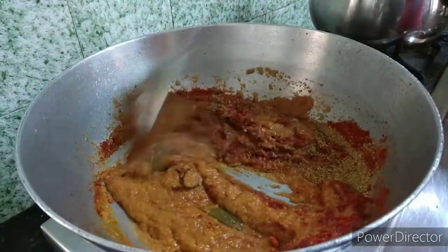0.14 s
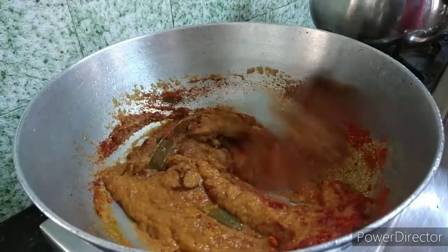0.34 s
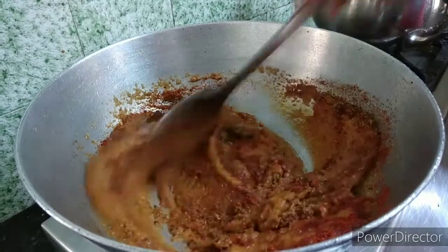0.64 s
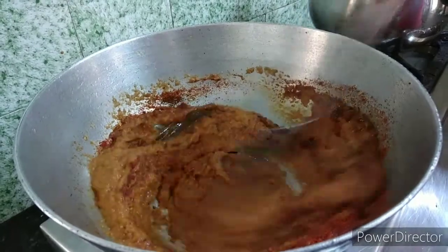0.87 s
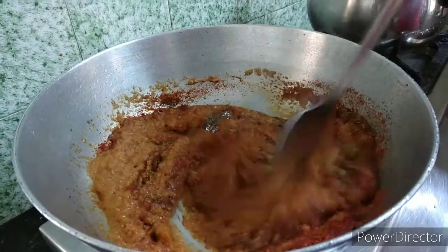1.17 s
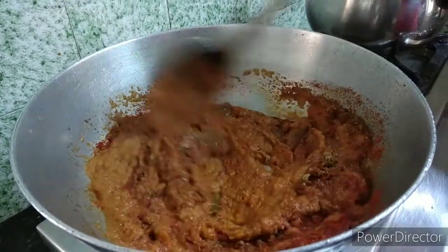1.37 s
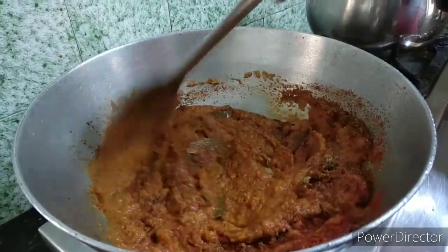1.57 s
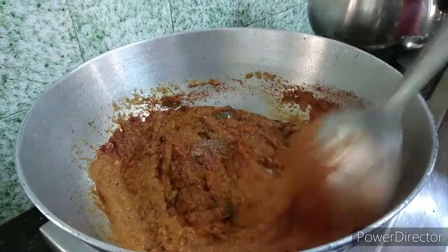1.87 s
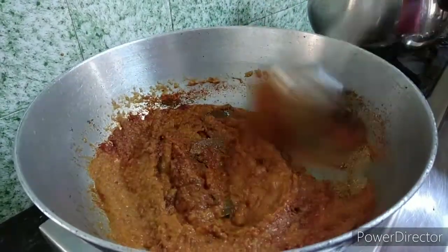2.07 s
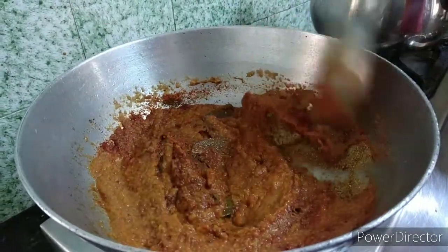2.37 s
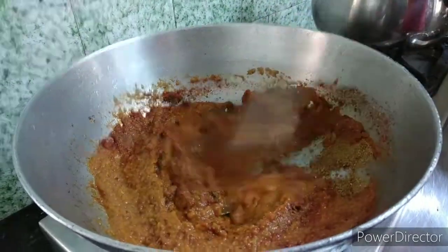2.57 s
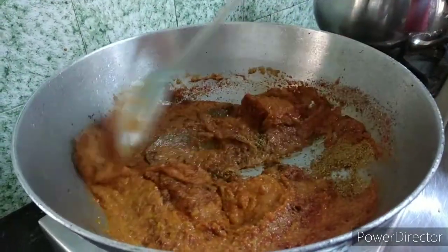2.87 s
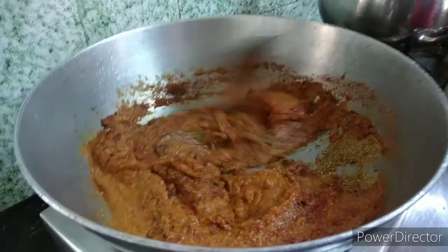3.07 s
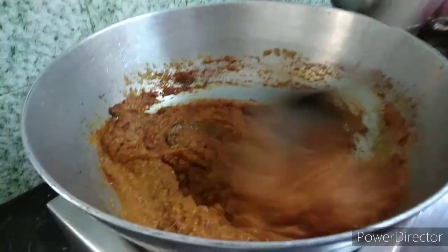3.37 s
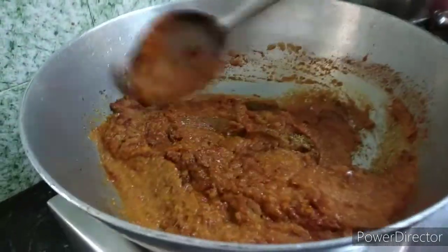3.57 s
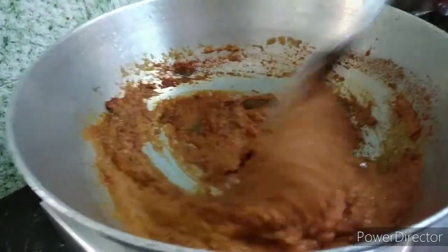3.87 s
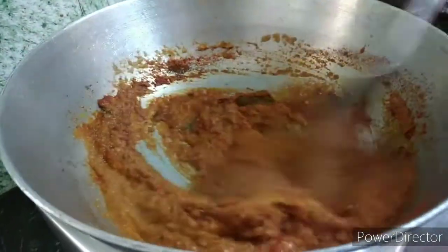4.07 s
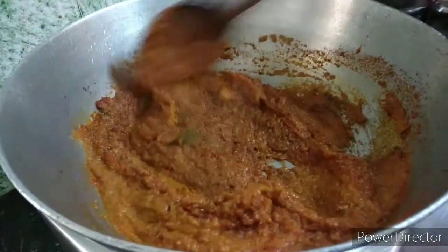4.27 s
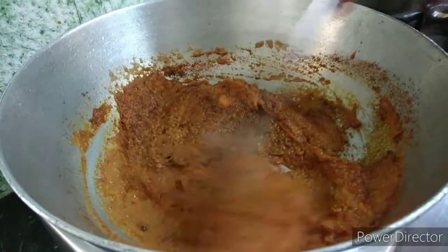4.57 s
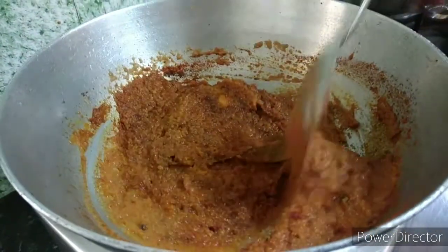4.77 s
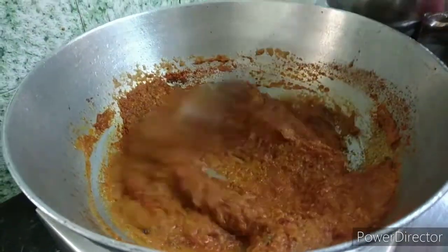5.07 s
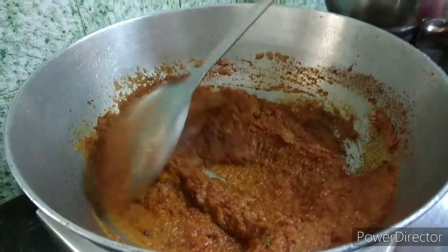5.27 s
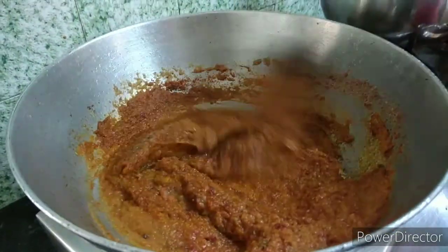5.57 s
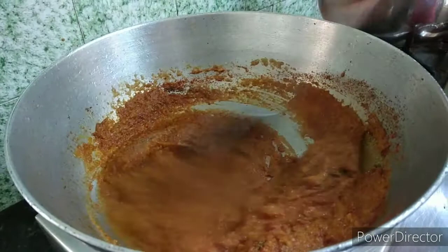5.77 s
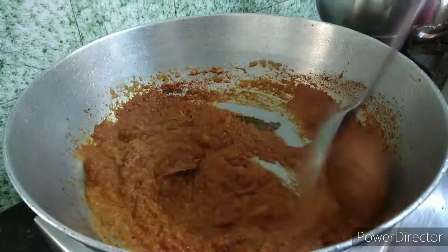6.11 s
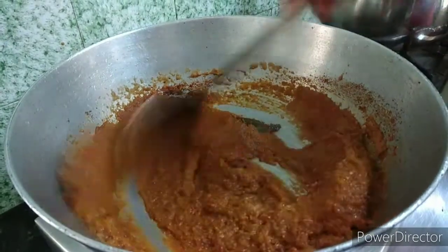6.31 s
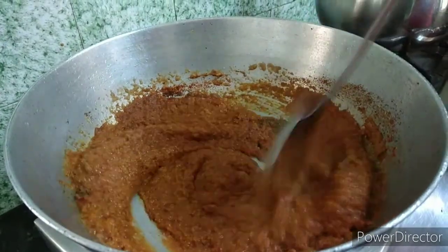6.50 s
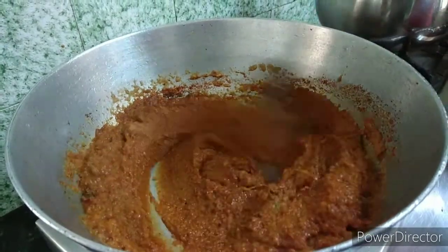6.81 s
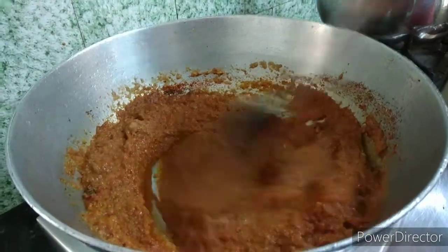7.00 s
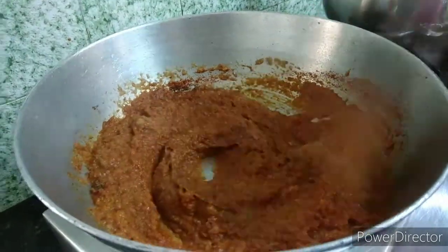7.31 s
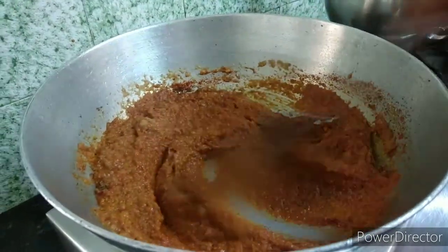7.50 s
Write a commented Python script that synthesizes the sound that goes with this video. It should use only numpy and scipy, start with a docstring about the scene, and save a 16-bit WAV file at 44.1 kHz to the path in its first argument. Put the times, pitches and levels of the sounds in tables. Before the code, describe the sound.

A metal spoon scrapes and knocks in a wide metal pan of thick gravy, uneven quick strokes, faint sizzle, close up in a small kitchen.

```python
"""A spoon scrapes and knocks in a wide metal pan of thick gravy, close to a phone with two microphones.
The spoon's edge slips in dense tiny jerks, and each knock is a sharp blow with a short noisy rattle of rebounds;
both excite banks of damped metal modes. Filtered noise makes the rumbling stand, faint sizzle, spits and hiss.
The bare rim rings on as pairs of beating sines and the lifted spoon as plain ones; decaying noise is the room."""
import sys
import numpy as np
from scipy import signal
from scipy.fft import rfft, irfft
from scipy.io import wavfile
from scipy.ndimage import uniform_filter1d, map_coordinates

SR = 44100
rng = np.random.default_rng(int(sys.argv[2]) if len(sys.argv) > 2 else 0)


def master(y):
    """Save y as 16-bit WAV."""
    cut = np.clip(np.atleast_2d(y).T, -1, 1)
    pcm = np.round(cut * 32767)  # scale
    wavfile.write(sys.argv[1], SR, pcm.astype(np.int16))


N = 337365

# Where the spoon touches decides which modes speak loudest. Each row: time in seconds, favoured pitch of the
# bowl, wall and edge in Hz before wandering, wall share in dB, left minus right in dB.
CONTACT = [(0.1, 910, 2280, 9050, 2, -1.5), (0.21, 712, 2040, 9200, -2, -0.5),
           (0.42, 896, 2600, 9100, -1, -0.5), (0.56, 750, 2940, 8900, 0, 0), (0.62, 793, 2970, 7550, 7, -1),
           (0.665, 800, 2600, 8200, 6.5, 0.5), (0.71, 872, 2640, 8700, -1, 0.5),
           (1.0, 750, 2860, 9500, 3.5, -1), (1.45, 415, 2900, 8850, 0.5, 0),
           (1.62, 740, 1530, 9600, 5, 1.5), (1.7, 756, 1920, 7900, -2, -2.5),
           (1.9, 700, 1950, 7940, -5.5, -1.5), (2.34, 556, 1970, 8570, -5, -4),
           (2.46, 680, 1900, 8500, 7.5, 0.5), (2.83, 630, 2230, 9000, 1, 0.5),
           (3.0, 742, 2280, 9450, -1, -1), (3.56, 585, 2600, 8960, -0.5, 0), (3.93, 850, 2190, 9500, -3, 2),
           (4.27, 477, 2560, 9100, 1.5, 0.5), (4.41, 1090, 2450, 8850, -0.5, -1.5),
           (4.56, 780, 2270, 9000, 1, 1), (4.84, 825, 2160, 9000, 4.5, 1), (5.2, 445, 1900, 9050, 3, -0.5),
           (5.6, 858, 2780, 9000, 0, -0.5), (5.88, 690, 2900, 8950, 0, 0), (5.93, 684, 2850, 9550, 8, -3.5),
           (5.97, 696, 2540, 9500, 5.5, -1), (6.02, 898, 2140, 9500, -0.5, -0.5),
           (6.16, 894, 2420, 9500, 2.5, -1), (6.54, 757, 2930, 9100, -0.5, -1),
           (6.9, 694, 2640, 9000, 1.5, 0), (7.26, 1035, 2150, 7340, 2, -0.5),
           (7.35, 714, 2430, 8000, 1.5, -1), (7.45, 650, 2570, 8600, 2.5, 2.5)]


def undb(db):
    """Decibels to gain."""
    return 10 ** (np.asarray(db) / 20)


def unit(x):
    """Scale to rms 1."""
    return x / np.sqrt(np.mean(x ** 2))


def curve(rows):
    """Columns of a time table, one value a sample."""
    s, *columns = np.transpose(rows)
    t = np.arange(N) / SR
    return np.array([np.interp(t, s, column) for column in columns])


def along(table, hz):
    """Read a (Hz, value) table on a log frequency axis."""
    f, value = np.transpose(table)
    return np.interp(np.log(hz), np.log(f), value)


def band(x, lo_hz, hi_hz):
    """Band-pass."""
    return signal.sosfilt(signal.butter(2, [lo_hz, hi_hz], "band", fs=SR, output="sos"), x)


def rings(hz, db, t60, seconds, sign=1):
    """Response to one tap: a sum of sines, each losing 60 dB in its t60 seconds."""
    t = np.arange(int(seconds * SR)) / SR
    hz, gain, t60 = (np.asarray(v)[:, None] for v in (hz, sign * undb(db), t60))
    decay = np.exp(-np.log(1000) * t / t60)
    return np.sum(gain * np.sin(2 * np.pi * hz * t) * decay, axis=0)


def through(x, response):
    """Convolve and keep the length."""
    return signal.oaconvolve(x, response)[:N]


def walk(rate):
    """Random levels held 1 / rate seconds and smoothed twice; spread near 1."""
    k = int(SR / rate)
    steps = np.repeat(rng.standard_normal(N // k + 1), k)
    return 1.555 * uniform_filter1d(uniform_filter1d(steps, k), k)[:N]


def hump(start_s, rise_s, hold_s, fall_db_per_s):
    """Gain that rises, holds and then fades."""
    t = np.arange(N) / SR - start_s
    fade = undb(-fall_db_per_s * np.maximum(t - rise_s - hold_s, 0))
    return np.clip(t / rise_s, 0, 1) * fade


def even(response, power, width_hz):
    """Bring the broad colour of a response to the given power per Hz, causally; the fine modes stay."""
    n = 2 * (len(power) - 1)
    k = int(width_hz * n / SR)

    def smooth(v):
        return uniform_filter1d(uniform_filter1d(v / v.sum(), k), k) + 1e-7

    spectrum = rfft(response, n)
    log_gain = np.log(smooth(power) / smooth(np.abs(spectrum) ** 2)) / 2
    # folding the cepstrum onto its first half makes the correction minimum phase
    cepstrum = irfft(log_gain, n)
    cepstrum[1:n // 2] *= 2
    cepstrum[n // 2 + 1:] = 0
    return irfft(spectrum * np.exp(rfft(cepstrum)), n)[:len(response)]


def slips(per_s, spread_db, patchy_db):
    """Stick-slip jerks: random impulses of either sign and uneven size, coming in patches."""
    when, size, sign = rng.random((3, N))
    uneven_db = -spread_db * np.log(np.maximum(size, .01))
    patches_db = patchy_db * (walk(45) + 0.59 * walk(220))
    return unit((when < per_s / SR) * np.sign(sign - .5) * undb(uneven_db + patches_db))


def touches():
    """Force of the sliding and knocking spoon on the bowl, wall and edge modes (part, ear, sample)."""
    # Spoon pressure, one list a stroke. Each row: time in seconds, level in dB, brightness in dB.
    strokes = [
        [(0.0, -33.5, -17), (0.06, -40, 2.5), (0.078, -38.5, 3.5), (0.18, -39, -0.5), (0.215, -27, 0),
         (0.264, -31.5, 2), (0.398, -33.5, -4), (0.434, -36, 7.5), (0.585, -32, -3), (0.615, -24, 3.5),
         (0.672, -30.5, 5), (0.725, -21, -8), (0.74, -47, -11)],
        [(0.782, -40.5, -3), (0.872, -31, 5.5), (0.93, -40.5, -3)],
        [(0.966, -30.5, 4), (1.005, -30.5, 3), (1.05, -35, 7), (1.122, -34.5, -7.5), (1.168, -42.5, 11)],
        [(1.44, -38.5, -11), (1.456, -39, -3), (1.51, -50.5, 7)],
        [(1.62, -23, 1), (1.652, -27.5, -8), (1.686, -33, 5), (1.702, -24.5, 2), (1.75, -20, -2),
         (1.795, -25, 2.5), (1.842, -37, 3), (1.88, -32, 7), (1.92, -60, -8)],
        [(2.336, -50.5, -18), (2.376, -49, -19), (2.382, -39.5, -21), (2.436, -34, -20.5), (2.48, -36.5, -5.5)],
        [(2.8, -32, -9), (2.85, -37, -5), (2.934, -39, 2)],
        [(2.955, -26, -1), (3.01, -28.5, 0.5), (3.06, -32, 2), (3.13, -45, 3.5), (3.185, -42.5, 1),
         (3.206, -33.5, -2.5)],
        [(3.56, -33, -1), (3.59, -33, 0), (3.642, -36.5, 6)],
        [(3.935, -20.5, 12.5), (3.98, -29, -8)],
        [(4.28, -44.5, 7), (4.352, -38, 6.5), (4.448, -25, -1), (4.558, -26.5, -10.5), (4.574, -45, -5),
         (4.648, -39.5, -29)],
        [(4.845, -26, -7), (4.88, -43, -4)],
        [(5.21, -50, -25), (5.252, -42.5, -6), (5.304, -29.5, 2.5), (5.376, -25.5, -11), (5.398, -29, 2.5),
         (5.43, -57, -30)],
        [(5.48, -39, 4.5), (5.54, -37.5, -3), (5.556, -34, -5.5), (5.728, -44, 4.5), (5.734, -39, 7),
         (5.842, -39.5, -0.5)],
        [(5.886, -24, -5.5), (5.95, -27, 3), (6.016, -27.5, -9), (6.09, -31, -3)],
        [(6.126, -28, 5), (6.136, -22.5, -3), (6.16, -23.5, 1.5), (6.2, -36, -5)],
        [(6.418, -47, -7), (6.439, -47, -9), (6.446, -29.5, -9), (6.502, -36, -7)],
        [(6.552, -30, 5.5), (6.682, -29, -2.5), (6.738, -44, 5), (6.768, -32.5, 4), (6.84, -37, -6.5),
         (6.88, -38, 1), (6.95, -35.5, 5)],
        [(7.265, -27, 12), (7.286, -35, 14), (7.336, -24.5, -4), (7.38, -22.5, -6), (7.424, -26.5, -1),
         (7.442, -36, 3)],
    ]
    # Each row: start in seconds, force on the edge in dB, bowl share in dB, wall share in dB, rebounds in dB.
    knocks = [(0.0796, -5, 2, -2.5, -31.5), (0.186, -12.5, 6, -3, -33), (0.728, -7.5, 8.5, -4, -35),
              (0.9654, -4.5, -0.5, 1, -31), (1.1591, -1, -20, -15, -32), (1.4383, 2, -6.5, -6, -55),
              (1.6115, 9, 3, -2, -36), (1.7332, -4, -15, -10, -31), (1.7536, 0.5, 5, -6, -35.5),
              (1.9267, -13.5, 11.5, 5, -35.5), (2.3785, -33.5, 14, -3, -31), (2.4035, -27, 17.5, -7, -30.5),
              (2.7962, 1, -1, -6.5, -31.5), (3.002, -9, 11, -4, -33), (3.137, -6.5, 2, -9, -39.5),
              (3.5552, 2.5, -5.5, -13, -31), (3.9294, 15.5, -4, 3.5, -39), (4.2728, -3.5, 0, -5, -31),
              (4.8391, 8, 4, 6.5, -37), (4.8523, 1.5, 1, -12.5, -33), (5.2062, -17.5, 19.5, 10, -34.5),
              (5.3922, -6.5, -3, -6, -30.5), (5.4816, -12.5, 6.5, 3.5, -32), (5.5495, -8.5, 2, -10, -29.5),
              (5.7320, -3.5, -7, -7, -36), (5.886, -2.5, 6, 4.5, -37.5), (5.9529, 9, -16, -5, -47),
              (5.9943, -0.5, 3, 1, -44), (6.4408, -14.5, 4.5, 0.5, -31), (6.55, -4, -2.5, -1, -30.5),
              (6.7651, -13.5, -5, 3, -29), (6.9083, -5.5, -7, -5, -30), (7.2591, 16.5, -15.5, -0.5, -34.5)]
    land_s, lift_s, lift_db, lift_brighter_db = 0.0062, 0.074, -39, 4.5  # fast landing, fade as the spoon lifts
    wall_db, wall_per_bright = -4, 0.78  # the wall follows the brightness less than the edge does

    force, t = np.zeros((3, N)), np.arange(N) / SR
    jerks = slips(1600, spread_db=3.5, patchy_db=3.0)
    wall_share_db, pan_db = curve(CONTACT)[3:]
    for stroke in strokes:
        start_s = stroke[0][0]
        end_s, end_db, end_bright_db = stroke[-1]
        lift = (end_s + lift_s, end_db + lift_db, end_bright_db + lift_brighter_db)
        bowl_db, bright_db = curve([*stroke, lift])
        stroke_wall_db = bowl_db + wall_share_db + wall_db + wall_per_bright * bright_db
        on = np.clip((t - start_s) / land_s, 0, 1) * (t <= end_s + lift_s)
        force += on * jerks * undb([bowl_db, stroke_wall_db, bowl_db + bright_db])

    # a knock is one sharp blow and a short rattle of rebounds
    after = np.arange(int(.03 * SR)) / SR
    chance = rng.standard_normal((len(knocks), len(after)))
    for (s, edge_db, bowl_share_db, wall_knock_db, rebound_db), rattle in zip(knocks, chance):
        blow = undb(rebound_db) * rattle ** 3 * np.exp(-after / 0.0072)  # cubing makes the rattle spiky
        blow[0] = 0.58
        i = int(s * SR)
        levels_db = [[edge_db + bowl_share_db], [edge_db + wall_knock_db], [edge_db]]
        force[:, i:i + len(after)] += undb(levels_db) * blow
    return force[:, None] * undb(np.array([pan_db, -pan_db]) / 2)


def spot(lo_hz, hi_hz, centre_hz, count, focus_db, crack=2.37, crack_s=0.0033, tick_db=-7):
    """Dense damped modes as excited from one place on the pan, strongest near one pitch; energy 1."""
    # Broad colour of the metal. Each row: frequency in Hz, level in dB per Hz.
    metal = [(120, -30.5), (220, -28.5), (318, 2.5), (480, -10.5), (717, -3.5), (1150, -2.5), (1430, -11),
             (2200, -15.5), (2850, -17), (3640, -21), (4400, -13.5), (5300, -7.5), (6500, -8), (10300, -9),
             (13000, -14.5), (15400, -31.5)]
    # Gravy damps the bowl. Each row: frequency in Hz, typical t60 in seconds before random scatter.
    metal_t60 = [(200, 0.18), (1000, 0.017), (4000, 0.042), (15000, 0.027)]
    # The bowl's strongest short modes. Each row: frequency in Hz, level in dB before random scatter,
    # t60 in seconds.
    bowl_rings = [(325, 0.5, 0.2), (384.7, -0.5, 0.42), (567.3, 0, 0.22), (712, -3, 0.042), (825, 3.5, .08),
                  (1160, 9.5, 0.067), (2300, -9, 0.13)]

    def colour_db(f):
        return along(metal, f) + focus_db * np.exp(-(np.log2(f / centre_hz) / 0.42) ** 2)

    hz = lo_hz + (hi_hz - lo_hz) * (np.arange(count) + rng.random(count)) / count
    t60 = along(metal_t60, hz) * undb(1.05 * rng.standard_normal(count))
    db = colour_db(hz) - 10 * np.log10(t60) + 3.68 * rng.standard_normal(count)
    response = rings(hz, db, t60, .1, sign=rng.choice([-1, 1], count))
    # the first wave leaves the contact as a crack before it spreads through the metal
    response *= 1 + crack * np.exp(-np.arange(len(response)) / SR / crack_s)

    f = np.maximum(np.fft.rfftfreq(8192, 1 / SR), 20)
    in_band = (f > .92 * lo_hz) * (f < 1.08 * hi_hz)
    response = even(response, undb(2 * colour_db(f)) * in_band, centre_hz / 8)
    response /= np.linalg.norm(response)

    strongest = np.array([m for m in bowl_rings if lo_hz < m[0] < hi_hz]).reshape(-1, 3)
    response += undb(-40.5) * rings(*strongest.T, .1, sign=rng.standard_normal(len(strongest)))
    # the contact itself is heard directly as a dry tick
    click = np.arange(len(response)) == 0
    tick = band(click, max(lo_hz, centre_hz / 2), min(hi_hz, centre_hz * 2))
    response += undb(tick_db) * tick / np.linalg.norm(tick)
    return response / np.linalg.norm(response)


def pan(places=8, alike=(.91, .15, .05), focus_db=(9, 13, 3), radiate_hz=235):
    """The contact wanders over the pan, so the mix of modes keeps changing; each ear hears its own mix."""
    # Limits in Hz of the bowl, wall and edge modes, from low to high.
    edges_hz = (100, 1450, 4800, 16500)
    force, out = touches(), np.zeros((2, N))
    wander = np.array([walk(11) for _ in range(places)])
    pitch_drift_db = [[.4], [.4], [1.2]] * np.array([walk(14) for _ in range(3)])
    heard_hz = curve(CONTACT)[:3] * undb(pitch_drift_db)
    for part, count in enumerate((56, 110, 220)):  # modes a spot in bowl, wall and edge
        lo_hz, hi_hz = edges_hz[part:part + 2]
        centres = np.geomspace(max(lo_hz * 0.96, 320), hi_hz * 0.79, places)
        octaves_off = np.log2(heard_hz[part] / centres[:, None])
        where = np.exp(.55 * wander - (octaves_off / .25) ** 2) + 1e-9
        weights = np.sqrt(where / where.sum(axis=0))
        share = alike[part]  # energy fraction of the response that both ears share
        for weight, centre_hz in zip(weights, centres):
            both, *own = (spot(lo_hz, hi_hz, centre_hz, count, focus_db[part]) for _ in range(3))
            for ear in range(2):
                response = np.sqrt(share) * both + np.sqrt(1 - share) * own[ear]
                out[ear] += through(force[part, ear] * weight, response)
    # the pan is too small to radiate bass
    return signal.sosfilt(signal.butter(3, radiate_hz, "high", fs=SR, output="sos"), out)


def stand():
    """As the pan rocks, dull noise shoves ring the low modes of the iron stand under it."""
    # Modes of the stand. Each row: frequency in Hz, level in dB, t60 in seconds.
    stand_modes = [(93.5, 2, 0.079), (128.4, 5, 0.13), (173.9, 5.1, 0.42), (246, 10.4, 0.13)]
    # The pan rocks on its stand. Each row: start in seconds, level in dB, hold in seconds.
    shoves = [(0.0, -72, 0.022), (0.854, -54, 0.057), (1.436, -70, 0.053), (1.607, -45.5, 0.029),
              (2.807, -71, 0.05), (3.152, -75, 0.1), (3.562, -72.5, 0.054), (3.918, -49, 0.11),
              (4.28, -50.5, 0.048), (4.854, -51, 0.046), (5.202, -59, 0.035), (5.99, -71, 0.055),
              (6.728, -56.5, 0.22), (7.245, -59, 0.042), (7.418, -60, 0.12)]
    rise_s, fall_db_per_s, rest_db = 0.0066, 111, -81
    push = undb(rest_db) + sum(undb(db) * hump(s, rise_s, hold_s, fall_db_per_s) for s, db, hold_s in shoves)
    rumble = through(rng.standard_normal(N), rings(*np.transpose(stand_modes), .3))
    return unit(rumble) * push


def sizzle():
    """Frying gravy: fine crackle of band-passed random impulses, with a few spits of fading noise."""
    # Each row: time in seconds, crackle level in dB.
    fizz_levels = [(0, -52), (1.3, -50), (1.58, -51.5), (2.05, -58.5), (2.3, -60.5), (2.75, -52),
                   (3.35, -58.5), (3.52, -60.5), (3.85, -51.5), (4.2, -57), (4.8, -64), (5.15, -57),
                   (6.35, -51), (7.15, -65), (7.65, -57)]
    # Each row: start in seconds, level in dB before a 7 dB lift, reference pitch in Hz just below the noise band.
    spits = [(2.074, -37, 12500), (2.2434, -42, 6070), (3.3744, -63.5, 8500), (3.4136, -46, 6200),
             (3.51, -49, 745), (3.8417, -42, 9900), (7.6071, -36, 6300)]
    crackle = [unit(band(slips(4600, spread_db=3.0, patchy_db=-3.0), 7000, 14000)) for _ in range(2)]
    fizz = np.array(crackle) * undb(curve(fizz_levels)[0])
    t = np.arange(int(0.039 * SR)) / SR
    puffs = rng.standard_normal((len(spits), 2, len(t)))
    for (s, db, hz), puff in zip(spits, puffs):
        i = int(s * SR)
        spit = band(puff, hz * 1.07, hz * 1.18) * np.exp(-t / 0.0054)
        fizz[:, i:i + len(t)] += undb(db + 7.0) * spit
    return fizz


def quiet():
    """Kitchen air and microphone hiss: coloured noise whose level drifts slightly."""
    # Colour of the background. Each row: frequency in Hz, relative level in dB per Hz.
    air_colour = [(18, -61), (30, -31.5), (92, -23.5), (398, 0), (800, -11), (1430, -15), (2230, -9),
                  (3760, -20), (5710, -29), (12500, 5.5), (15400, -25.5)]
    hz = np.maximum(np.fft.rfftfreq(N, 1 / SR), 20)
    air = irfft(rfft(rng.standard_normal((2, N))) * undb(along(air_colour, hz)), N)
    return unit(air) * undb(-64.5 + 1.5 * walk(3.6))


def room(dry, wet_db=-3.0, gap_s=0.004):
    """Small tiled room: dense noise echoes, decaying band by band; the bass is more alike at both ears."""
    # Each row: frequency in Hz, t60 in seconds.
    room_t60 = [(250, 0.39), (700, 0.24), (1800, 0.41), (5000, 0.32), (12000, 0.2)]
    t = np.arange(int(.7 * SR)) / SR
    echo = np.zeros((2, len(t)))
    for hz in 90 * 2. ** np.arange(8):  # octave bands
        mid, side = band(rng.standard_normal((2, len(t))), hz / np.sqrt(2), hz * np.sqrt(2))
        t60 = along(room_t60, hz)
        stereo = mid + min(hz / 1500.0, 1) * side * np.array([[1], [-1]])
        echo += stereo * np.exp(-np.log(1000) * t / t60) / np.sqrt(t60)
    echo *= 1 - np.exp(-(t / gap_s) ** 2)  # the echoes swell in after a short gap
    echo = np.array([even(e, np.ones(16385), width_hz=140) for e in echo])  # the tiles favour no pitch
    echo *= undb(wet_db) * np.sqrt(2) / np.linalg.norm(echo)
    return np.array([through(dry[ear], echo[ear]) for ear in range(2)])


def rim():
    """Blows and stick-slip rubs excite the bare rim, whose modes are close pairs that beat as they ring on."""
    # Each row: frequency in Hz, level in dB, t60 in seconds, left minus right in dB, twin higher by Hz,
    # twin level against the first in dB, twin t60 in seconds.
    rim_modes = [(167, -18, 1.4, 0, .2, -8, 1.4), (415, -26, 1.3, -8, .4, -8, 1.3),
                 (743, -15, .65, -5, 1.85, -9, 1.2), (1147, -14, .5, 3, 2.2, -21, 1.2),
                 (1620, -10, .75, 6, 3.5, -5, .9), (2164, -5, .52, 2, 1.2, -20, 1.7),
                 (2778, -10, .6, -5, 2.2, -14, .8), (3457, -8, .65, -3, 1.5, -12, .55),
                 (4210, -29, .35, 8, 3, -8, .35), (5905, -11, .15, 3, 5, -8, .15),
                 (6540, -13, .15, -3, 5, -8, .15), (6830, -11, .13, 2, 5, -8, .13),
                 (7262, -12, .13, -2, 6, -8, .13), (7740, -8, .13, 0, 6, -8, .13),
                 (9050, -11, .1, 3, 7, -8, .1), (9798, -8, .12, -2, 8, -8, .12),
                 (10720, -12, .1, 0, 8, -8, .1)]
    # The spoon rubs the rim. Each row: start in seconds, length in seconds, level in dB, favoured pitch in Hz,
    # fall in dB an octave away.
    rim_rubs = [(1.78, .08, -56.5, 2164, 119), (1.67, 0.19, -53.5, 8300, 28), (0.52, .11, -65.5, 7300, 23),
                (5.4, 0.12, -62, 6000, 24), (6.9, 0.037, -62, 9700, 20.5), (6.5, 0.16, -65.5, 8200, 24)]
    # Blows that reach the rim; the place struck favours some modes. Each row: time in seconds, level in dB,
    # favoured pitch in Hz, fall in dB an octave away.
    rim_blows = [(1.705, -29, 3370, 40.5), (1.756, -23.5, 2260, 43), (1.762, -21.5, 2880, 49.5),
                 (1.792, -18, 1620, 79.5), (1.81, -25, 743, 59.5), (1.812, -14, 1147, 92),
                 (3.16, -42, 1620, 149.5), (3.93, -21.5, 640, 4.5), (4.45, -34, 1190, 7),
                 (4.84, -32, 520, 4), (7.259, -35, 2300, 27), (7.42, -21.5, 415, 17),
                 (7.425, -22.5, 1252, 46), (7.43, -30.5, 2450, 60)]

    def favour(hz, db, place_hz, fall_db):
        return undb(db - fall_db * np.log2(hz / place_hz) ** 2)

    out, jerks = np.zeros((2, N)), slips(2600, spread_db=2.0, patchy_db=3.0)
    rubs = [(hump(s, .015, length_s, 900), place) for s, length_s, *place in rim_rubs]
    for hz, db, t60, pan_db, split_hz, twin_db, twin_t60 in rim_modes:
        push = jerks * sum(on * favour(hz, *place) for on, place in rubs)
        for s, *place in rim_blows:
            push[int(s * SR)] += favour(hz, *place)
        pair = rings([hz, hz + split_hz], [db, db + twin_db], [t60, twin_t60], 1.2)
        out += through(push, pair) * undb([[pan_db / 2], [-pan_db / 2]])
    return out


def spoon():
    """The spoon itself rings faintly as it leaves the pan: single impulses into three close modes."""
    # Modes of the lifted spoon. Each row: frequency in Hz, level in dB, t60 in seconds.
    spoon_modes = [(2385, -5, 1), (2420, -7.5, .9), (2450, -10.5, .7)]
    # Each row: time in seconds, level in dB.
    taps = [(1.22, -61), (7.05, -55)]
    push = np.zeros(N)
    for s, db in taps:
        push[int(s * SR)] = undb(db)
    return through(push, rings(*np.transpose(spoon_modes), .8))


def scene():
    """Pan and stand sound in the room; the left ear lags by a few samples, varying as the spoon moves."""
    left, right = pan() * undb(-2.5) + stand()
    lag = 6.2 + 2.53 * walk(3)  # samples
    near = np.array([map_coordinates(left, [np.arange(N) - lag], order=3), right])
    return near + room(near) + rim() + spoon() + sizzle() + quiet()


def record(dry, left_db=((250, -3.5), (650, -3.5), (1200, 0.3), (8000, .6), (12000, 3.5))):
    """Two microphones of different colour; the phone drops deep bass, rounds peaks and dims, then cuts, the top."""
    roll_hz, top_hz = 15450, 16800
    # left_db holds (Hz, left minus right in dB), split evenly between the two
    lean_db = along(left_db, np.maximum(np.fft.rfftfreq(N, 1 / SR), 20)) / 2
    x = irfft(rfft(dry) * undb([lean_db, -lean_db]), N)
    x = signal.sosfilt(signal.butter(2, 95, "high", fs=SR, output="sos"), x)
    x = .8 * np.tanh(1.35 * x)  # the loudest peaks are rounded
    below = signal.sosfiltfilt(signal.ellip(6, .2, 40, roll_hz, fs=SR, output="sos"), x)
    x = below + undb(-33.5) * (x - below)
    return signal.sosfilt(signal.ellip(10, .2, 90, top_hz, fs=SR, output="sos"), x)


dry = scene()
out = record(dry)
master(out)
```